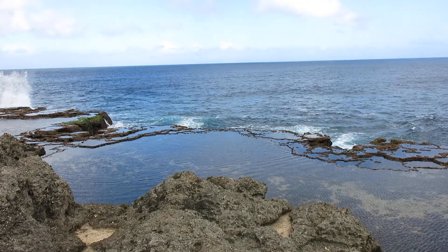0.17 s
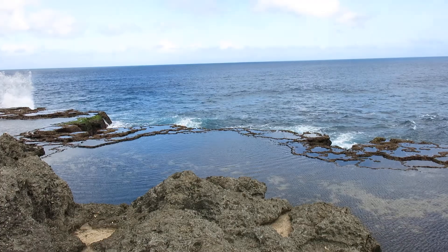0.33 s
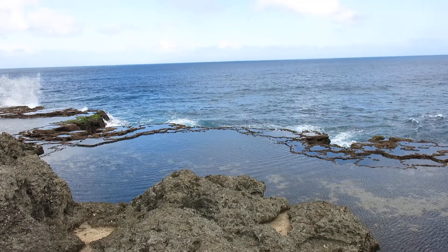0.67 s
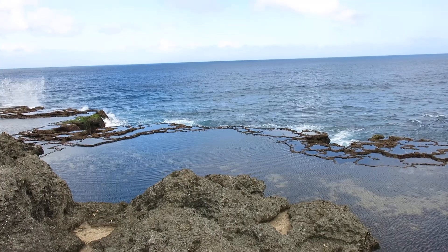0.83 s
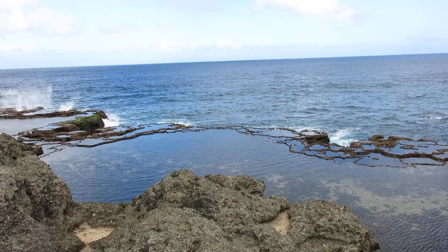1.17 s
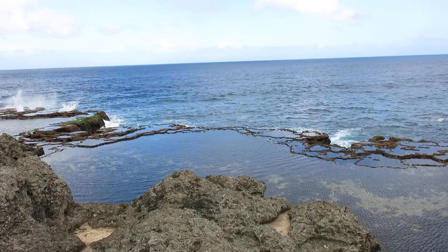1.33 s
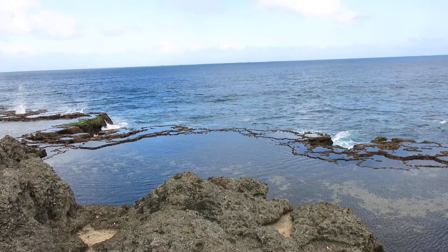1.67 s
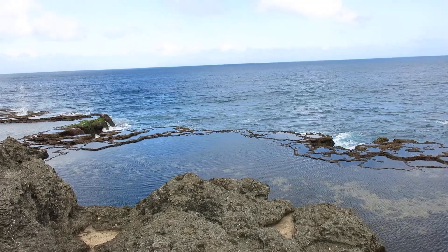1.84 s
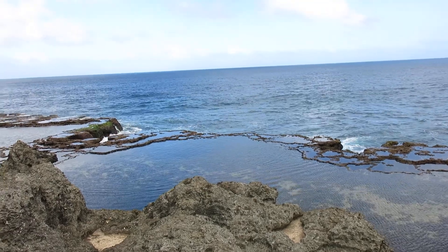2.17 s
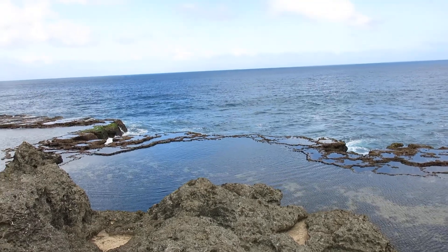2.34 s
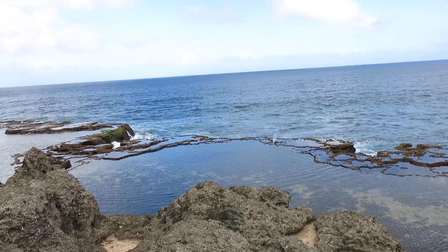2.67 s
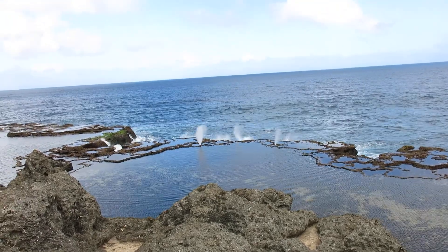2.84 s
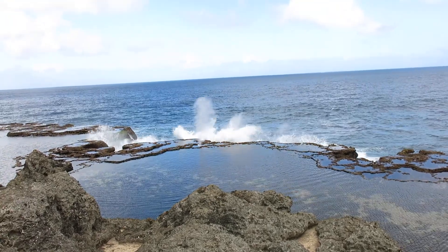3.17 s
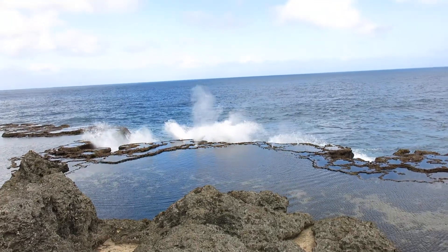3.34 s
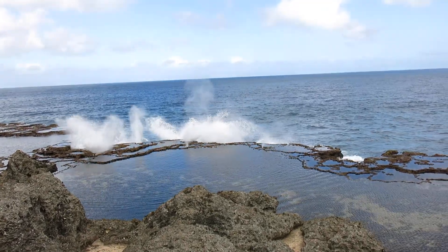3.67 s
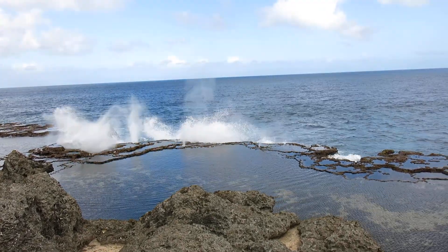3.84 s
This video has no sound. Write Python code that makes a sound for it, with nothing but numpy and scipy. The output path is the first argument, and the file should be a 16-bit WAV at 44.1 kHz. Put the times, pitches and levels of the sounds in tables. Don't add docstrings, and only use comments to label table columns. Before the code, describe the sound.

Blowhole burst of water and air whooshes from a rocky shore over steady surf roar

```python
import sys
import numpy as np
from scipy import signal
from scipy.fft import rfft, irfft
from scipy.io import wavfile

SR = 44100
rng = np.random.default_rng(int(sys.argv[2]) if len(sys.argv) > 2 else 0)


def gain_from_db(level_db):
    decades = np.asarray(level_db, float) / 20
    return 10 ** decades


def master(y):
    cut = np.clip(np.atleast_2d(y).T, -1, 1)
    pcm = np.round(cut * 32767)
    wavfile.write(sys.argv[1], SR, pcm.astype(np.int16))


N = 176400

TIME = np.arange(N) / SR
LEFT_RIGHT = np.array([[.5], [-.5]])
CHURN_STEP = 20


def rms_one(x):
    return x / np.sqrt(np.mean(x ** 2) + 1e-20)


def in_time(rows):
    s, *columns = np.transpose(rows)
    return [np.interp(TIME, s, column) for column in columns]


def at_hz(points, hz):
    point_hz, value = np.transpose(points)
    return np.interp(np.log(hz + 1), np.log(point_hz), value)


def drift(rate_hz, count):
    r = np.exp(-2 * np.pi * rate_hz * CHURN_STEP / SR)
    settle = 3000
    slow = signal.lfilter([1], [1, -2 * r, r * r], rng.standard_normal(count + settle))[settle:]
    return rms_one(slow - slow.mean())


def ring(hits, hz, cycles):
    r, w = gain_from_db(-60 * hz / (cycles * SR)), 2 * np.pi * hz / SR
    return signal.lfilter([0, np.sin(w)], [1, -2 * r * np.cos(w), r * r], hits)


def rush(colour, alike, lead_s, shared_db, own_db, rate_hz, bright_db=None, top_hz=None, since_s=0, order=2):
    first = int(since_s * SR)
    n = N - first
    hz, steps = np.fft.rfftfreq(n, 1 / SR), np.arange(first, N, CHURN_STEP)

    likeness = np.clip(at_hz(alike, hz), -.99, .99)
    mid, side = rfft(rng.standard_normal((2, n)))
    mid, side = np.sqrt(1 + likeness) * mid, np.sqrt(1 - likeness) * side
    pair = np.array([mid + side, (mid - side) * np.exp(-2j * np.pi * hz * lead_s)])
    low_hz, high_hz = colour[0][0], colour[-1][0]
    pair = pair * gain_from_db(at_hz(colour, hz)) * (hz > low_hz) * (hz < high_hz * 1.05)

    bands_per_octave = order * .75
    place = bands_per_octave * np.log2((hz + 1) / 20)
    together = drift(rate_hz, len(steps))
    out = np.zeros((2, N))
    for k in range(order * 8):
        centre_hz = 20 * 2 ** (k / bands_per_octave)
        db = shared_db * together + own_db * drift(rate_hz, len(steps))
        if not low_hz / 1.6 < centre_hz < high_hz * 1.7:
            continue
        if bright_db is not None:
            db = db + bright_db[steps] * np.log2(centre_hz / 1000)
        if top_hz is not None:
            db = db - 24 * np.maximum(np.log2(centre_hz / top_hz[steps]), 0)
        share = np.cos(np.pi / 2 * np.clip(place - k, -1, 1)) ** 2
        out[:, first:] += np.interp(np.arange(first, N), steps, gain_from_db(db)) * irfft(pair * share, n)

    if first:
        out = out * np.clip((np.arange(N) - first) / (.2 * SR), 0, 1) ** 2
    return out / np.sqrt(np.mean(irfft(pair, n) ** 2))


# start_s [s], level_db [dB]
SURF_LEVEL = [
    (.2, -31),
    (.75, -31),
    (1.3, -33),
    (1.8, -31),
    (2.25, -32),
    (2.6, -29.5),
    (3.2, -31.5),
    (4, -26.5),
]
# pitch_hz [Hz], level_db [dB per Hz]
SURF_SPECTRUM = [(25, -22), (70, 1), (250, 4.5), (800, -0.5), (1600, -6.5), (3200, -18), (7000, -22.5),
                 (16000, -39)]
# pitch_hz [Hz], likeness [0-1]
SURF_LIKENESS = [(60, 1), (300, 0.42), (500, 0.26), (770, 0.67), (1170, 0.25), (2700, 0.77), (8000, 1),
                 (15000, 0)]


def surf():
    level_db, = in_time(SURF_LEVEL)
    return gain_from_db(level_db) * rush(SURF_SPECTRUM, SURF_LIKENESS, 1.2e-5, 0.2, 0.32, 6.2)


# start_s [s], level_db [dB], brightness [dB per octave]
SPRAY_LEVEL = [(.2, -42.5, 0.2), (.45, -41.5, -1.7), (.65, -41, -1.5), (.9, -44.5, 0), (1.2, -40.5, -1),
               (1.45, -46.5, 1.3), (1.65, -43, 0.6), (1.85, -41, -1.5), (2.1, -49, 1), (2.3, -49.5, 0.1),
               (2.55, -45.5, -0.2), (2.8, -39, -2), (3.4, -45, -1), (4, -41, 1.5)]
# pitch_hz [Hz], level_db [dB]
SPRAY_SPECTRUM = [(600, 3.5), (2000, -1.5), (4500, 0), (7000, -3.5), (10000, -6.5), (13500, -10),
                  (14800, -18), (16000, -38)]
# pitch_hz [Hz], likeness [0-1]
SPRAY_LIKENESS = [(1000, 0.91), (6000, 0.76), (10500, 0.82), (15000, 0.42)]


def spray():
    level_db, bright_db = in_time(SPRAY_LEVEL)
    return gain_from_db(level_db) * rush(SPRAY_SPECTRUM, SPRAY_LIKENESS, 5.2e-5, 0.27, 0.45, 4.3, bright_db)


def drops():
    drops_per_s, spread_db, below_spray_db = 400, 5, -13
    falls = rng.random(N) < drops_per_s / SR
    sizes = gain_from_db(spread_db * np.minimum(rng.exponential(1, N), 4)) * falls
    dealt = rng.integers(0, 16, N)
    out = np.zeros((2, N))
    for k, hz in enumerate(np.geomspace(3460, 10900, 16)):
        ringing = ring(sizes * (dealt == k) + 1e-18, hz, cycles=11)
        out += gain_from_db(at_hz(SPRAY_SPECTRUM, hz) + rng.normal(0, 2.7) * np.array([[1], [-1]])) * ringing
    return gain_from_db(in_time(SPRAY_LEVEL)[0] + below_spray_db) * rms_one(out)


# start_s [s], level_db [dB]
WIND_LEVEL = [(0.25, -41.5), (0.38, -38), (0.52, -42), (0.8, -34), (0.95, -38), (1.15, -40), (1.4, -40),
              (1.6, -42), (1.85, -41), (2.0, -32.5), (2.2, -44), (2.45, -39.5), (2.75, -40), (2.9, -49),
              (3.3, -49), (3.5, -34), (3.7, -50), (4.0, -46)]
# pitch_hz [Hz], level_db [dB]
WIND_SPECTRUM = [(15, -14), (40, -10), (60, -7), (90, -4), (150, -10), (220, -22), (400, -53)]
# pitch_hz [Hz], likeness [-1 to 1]
WIND_LIKENESS = [(20, -0.91), (50, -0.68), (120, -0.36), (300, -0.31)]
# start_s [s], peak_db [dB], pitch_hz [Hz], left_right_db [dB]
WIND_EDDIES = [(0.3, -24, 97, -5), (0.328, -25, 95, -4), (0.375, -23, 117, -3), (0.658, -22, 87, -2),
               (0.699, -30, 72, 9), (0.712, -19, 125, 2), (0.741, -20, 109, -4), (0.776, -23, 56.5, -3),
               (0.79, -27, 70.5, 8), (0.815, -21, 75, -4), (0.828, -11, 96, 3.5), (0.85, -6.5, 96, -1.5),
               (0.888, -15, 108, 3), (0.906, -31, 87, 1), (1.462, -24, 75, 5), (1.542, -16, 83, 1),
               (1.582, -20.9, 62, 0.5), (1.67, -14, 85, -1.7), (1.684, -20, 126, -2), (1.701, -14, 75.5, 1),
               (1.733, -19.3, 121, -2), (1.755, -21, 69, 2), (1.906, -23, 96, -5), (1.947, -6, 100, 2),
               (1.981, -11, 108, -0.5), (1.996, -11.5, 108, -3.5), (2.066, -12.5, 122, 5),
               (2.59, -18.5, 98, 9.5), (2.723, -23, 91, -7), (2.745, -20, 78, -4)]


def wind():
    out = gain_from_db(in_time(WIND_LEVEL)[0] + 1) * rush(WIND_SPECTRUM, WIND_LIKENESS, 0, 0.89, 0.59, 9.1)
    half, eddy_cycles = 2000, 0.39
    t = np.arange(-half, half) / SR
    for (s, db, hz, lean_db), turn in zip(WIND_EDDIES, rng.random(len(WIND_EDDIES))):
        gust = np.exp(-.5 * (t * hz / eddy_cycles) ** 2)
        swing = gust * np.cos(2 * np.pi * (hz * t + turn))
        i = int(s * SR) - half
        out[:, i:i + len(t)] += gain_from_db(db + lean_db * LEFT_RIGHT) * [[1], [-1]] * swing
    return out


# start_s [s], peak_db [dB], pitch_hz [Hz]
DULL_THUDS = [(0.968, -18.5, 79), (2.858, -18.5, 93.5), (3.307, -24, 128), (3.378, -19, 116),
              (3.739, -31, 80.7), (0.9, -24, 45), (1.02, -23, 45), (2.985, -12, 310), (3.02, -14, 320),
              (3.722, -16, 310), (3.769, -20, 152)]


def thuds():
    trim_db, fall_60db_s = 2.5, 0.062
    out, t = np.zeros(N + SR), np.arange(SR // 4) / SR
    for s, db, hz in DULL_THUDS:
        i = int(s * SR)
        soft_start = np.tanh(t * hz * 3)
        decay = gain_from_db(db + trim_db - 60 * t / fall_60db_s)
        out[i:i + len(t)] += decay * np.sin(2 * np.pi * hz * t) * soft_start
    return out[:N]


# start_s [s], peak_db [dB]
ROCK_TICKS = [
    (1.011, -40),
    (1.2, -48),
    (1.615, -43),
    (1.939, -45),
]


def ticks():
    length = 200
    out, t = np.zeros(N), np.arange(length) / SR
    for s, db in ROCK_TICKS:
        i = int(s * SR)
        out[i:i + length] += gain_from_db(db + 7 - 60 * t / .008) * rng.standard_normal(length)
    return signal.sosfilt(signal.butter(2, [6500, 12500], "band", fs=SR, output="sos"), out)


# start_s [s], level_db [dB], brightness [dB per octave], spray_top_hz [Hz]
COLUMN_LEVEL = [
    (2.3, -67, -14, 9100),
    (2.76, -31, -5, 9000),
    (2.92, -19.5, -3.5, 9500),
    (2.965, -13, -1.4, 10500),
    (3.09, -12.5, -0.3, 9800),
    (3.16, -15.5, -0.5, 8100),
    (3.22, -22, 0.2, 7000),
    (3.29, -33.5, 0.5, 6200),
    (3.42, -59, 3, 5500),
]
# pitch_hz [Hz], level_db [dB]
COLUMN_SPECTRUM = [(24, -52), (50, -21), (310, -6.5), (760, -1.5), (1250, -6), (3000, -17.5), (7000, -23.5),
                   (15600, -31.5)]
# pitch_hz [Hz], likeness [0-1]
VENT_LIKENESS = [(60, 0.94), (200, 1), (500, 0.95), (770, 0.94), (1100, 0.96), (2700, 0.93), (8000, 0.91),
                 (13000, 0.56)]
# start_s [s], depth_db [dB], length_s [s]
VENT_CHOKES = [
    (3.008, -4.5, 0.013),
    (3.025, -2, 0.01),
    (3.04, -1, .014),
    (3.05, -1.5, .01),
    (3.1, -3.5, 0.011),
    (3.15, -2.5, .01),
    (3.18, -1, .01),
]


def water_column():
    level_db, bright_db, top_hz = in_time(COLUMN_LEVEL)
    for s, depth_db, length_s in VENT_CHOKES:
        level_db = level_db + depth_db * np.exp(-.5 * (2 * (TIME - s) / length_s) ** 2)
    churn = rush(COLUMN_SPECTRUM, VENT_LIKENESS, 6e-6, 0.27, 0.91, 15.0, bright_db, top_hz, since_s=2.25, order=4)
    return gain_from_db(level_db) * churn


# start_s [s], level_db [dB]
AIR_LEVEL = [
    (2.74, -82),
    (2.8, -34),
    (2.87, -33),
    (2.93, -31),
    (2.99, -34),
    (3.04, -37),
    (3.17, -46),
    (3.4, -70),
]
# pitch_hz [Hz], level_db [dB]
AIR_SPECTRUM = [(1500, 0), (4000, -4), (8000, -11), (13000, -8), (14800, -11), (16000, -9)]


def vent_air():
    level_db, = in_time(AIR_LEVEL)
    return gain_from_db(level_db) * rush(AIR_SPECTRUM, VENT_LIKENESS, -3e-6, .5, .6, 15., since_s=2.7)


# start_s [s], peak_db [dB]
WATER_SLUGS = [(2.877, -15), (2.931, -12), (2.947, -15), (2.958, -11), (2.966, -19), (2.977, -6),
               (2.992, -18), (2.9995, -2), (3.027, -2), (3.047, -6), (3.066, -5), (3.092, -4), (3.084, -10),
               (3.106, -17), (3.123, -8), (3.146, -11), (3.165, -21), (3.189, -12), (3.254, -12.5),
               (3.655, -13), (3.67, -14), (3.7, -17), (3.727, -12), (3.74, -14)]


def slugs():
    pops = np.full(N, 1e-18)
    for s, db in WATER_SLUGS:
        pops[int(s * SR)] = gain_from_db(db - 1) * rng.choice([-1, 1])
    soft = signal.lfilter(np.hanning(18) / 5, 1, pops)
    return ring(soft, hz=690, cycles=6.9)


# start_s [s], level_db [dB], brightness [dB per octave]
SURGE_LEVEL = [
    (3.1, -25, -0.5),
    (3.33, -27.5, -1),
    (3.5, -25.5, 0.4),
    (3.62, -23.5, -0.3),
    (3.67, -19.5, -0.4),
    (3.73, -17.5, -0.66),
    (3.8, -19, -0.06),
    (3.9, -19.5, -0.5),
    (4, -22.5, -0.2),
]
# pitch_hz [Hz], level_db [dB]
SURGE_SPECTRUM = [(18, -46), (45, -13), (110, -5), (308, -4), (750, -3.5), (1400, -13), (3200, -21.5),
                  (15600, -30.5)]


def second_surge():
    level_db, bright_db = in_time(SURGE_LEVEL)
    return gain_from_db(level_db) * rush(SURGE_SPECTRUM, VENT_LIKENESS, 1.6e-5, 0.71, 0.7, 4.8, bright_db, since_s=3.0)


# pitch_hz [Hz],
# width_hz [Hz], depth_db [dB]
ECHO_BANDS = [(486, 151, -8.5), (1017, 117, -5), (1048, 232, -6), (309, 29, 2), (574, 43, 3.5),
              (887, 78, 1.5), (250, 56, -1), (1550, 240, 1), (6000, 790, 0.5), (1804, 130, -3),
              (2250, 190, 0.5), (3180, 270, -3), (15700, 3600, -5.5)]
# pitch_hz [Hz], left_right_db [dB]
PAIR_TILT = [(60, 0), (130, -3), (290, -3), (640, -0.8), (3100, 1), (6000, 1.7), (9500, -3), (13500, 2)]


def rock_echoes(x, share):
    hz = np.fft.rfftfreq(N, 1 / SR)
    echo_db = np.zeros(len(hz))
    for centre_hz, width_hz, depth_db in ECHO_BANDS:
        echo_db += depth_db * np.exp(-.5 * ((hz - centre_hz) / (width_hz / 2)) ** 2)
    return irfft(rfft(x) * gain_from_db(share * echo_db + at_hz(PAIR_TILT, hz) * LEFT_RIGHT), N)


def scene():
    shore = rock_echoes(surf() + spray(), share=0.46)
    vents = vent_air() + water_column() + second_surge() + slugs()
    return shore + rock_echoes(vents + thuds(), share=1) + wind() + drops() + ticks()


def whine():
    return gain_from_db(-75) * np.sin(2 * np.pi * 15716 * TIME)


def top_cut(x):
    return signal.sosfilt(signal.butter(12, 15790, fs=SR, output="sos"), x)


def record(dry):
    start_s, fade_s = .2425, .0015
    mix = (dry + whine()) * np.clip((TIME - start_s) / fade_s, 0, 1)
    return top_cut(mix)


dry = scene()
out = record(dry)
master(out)
```